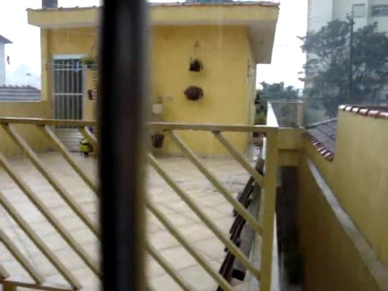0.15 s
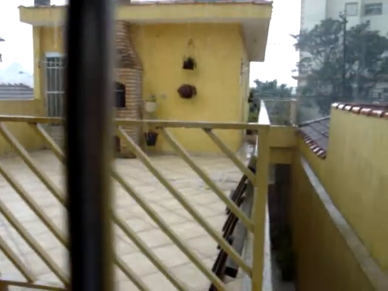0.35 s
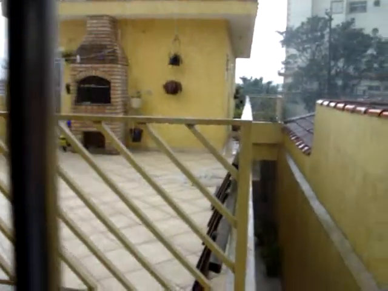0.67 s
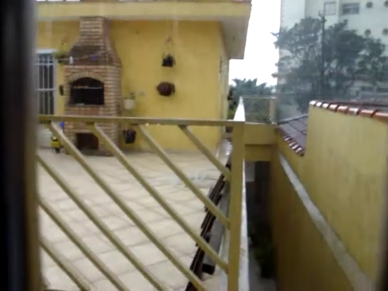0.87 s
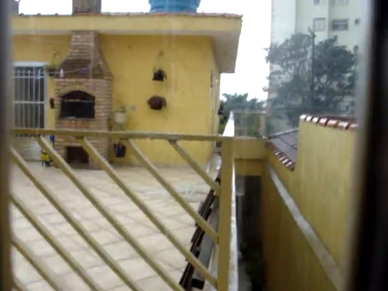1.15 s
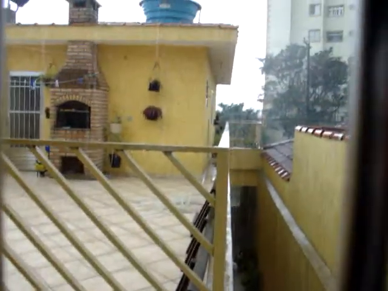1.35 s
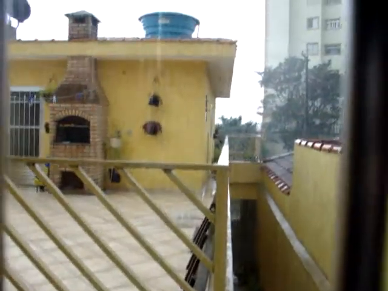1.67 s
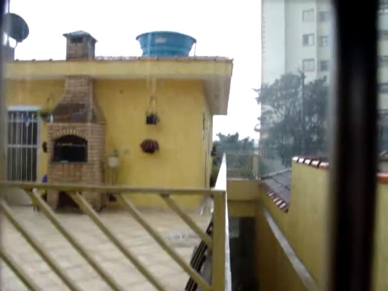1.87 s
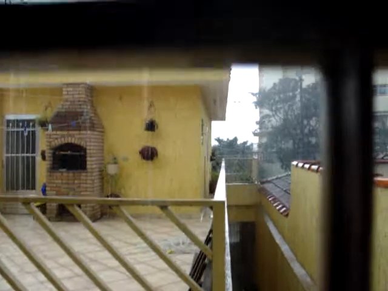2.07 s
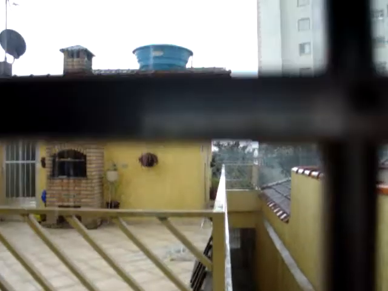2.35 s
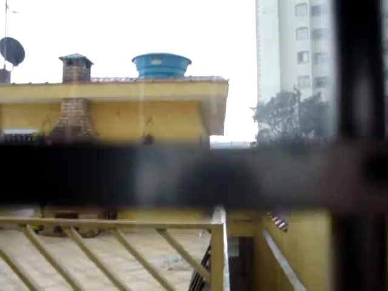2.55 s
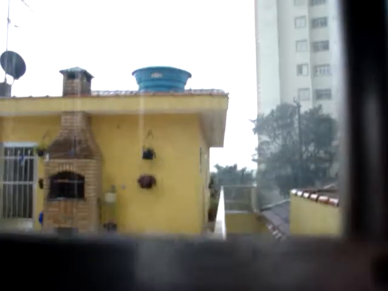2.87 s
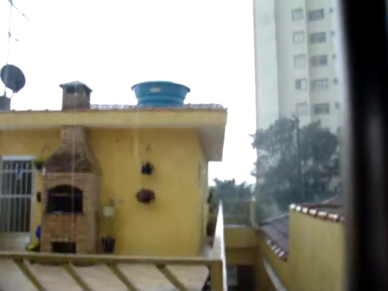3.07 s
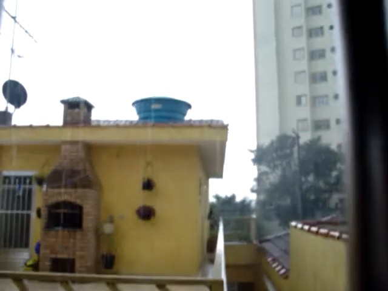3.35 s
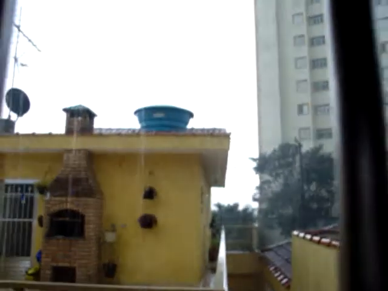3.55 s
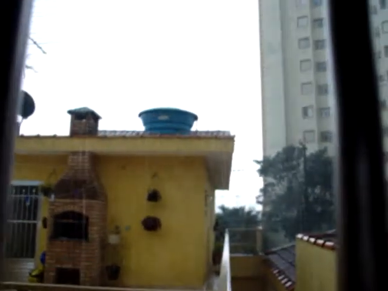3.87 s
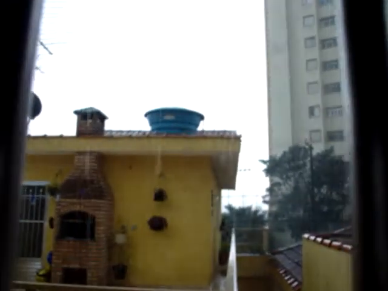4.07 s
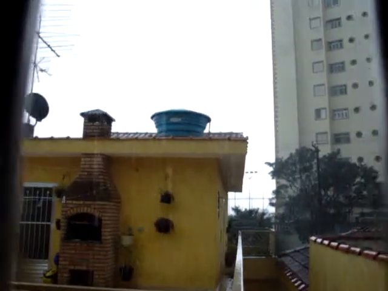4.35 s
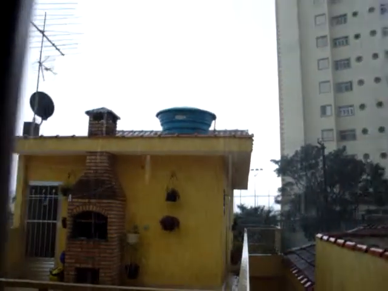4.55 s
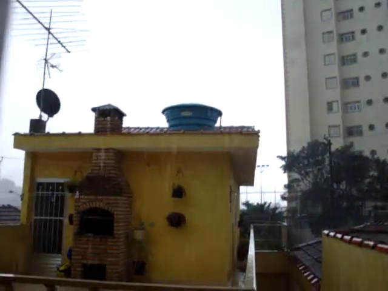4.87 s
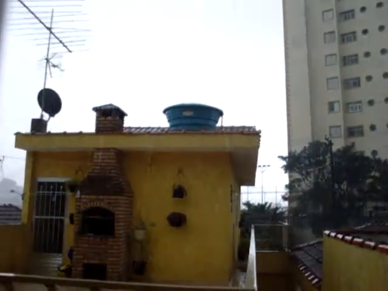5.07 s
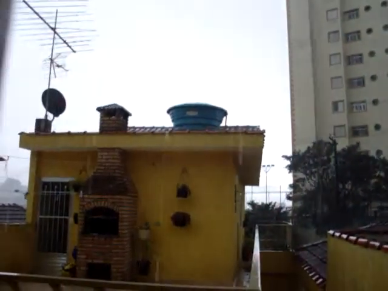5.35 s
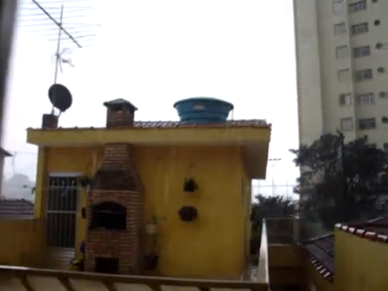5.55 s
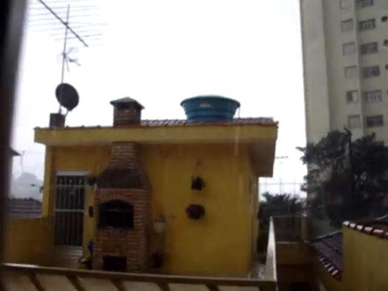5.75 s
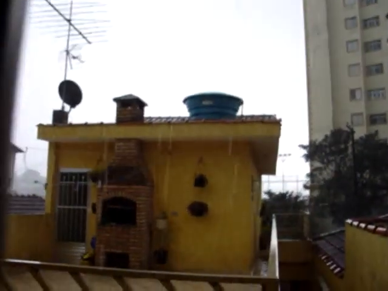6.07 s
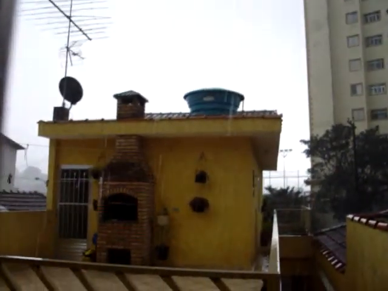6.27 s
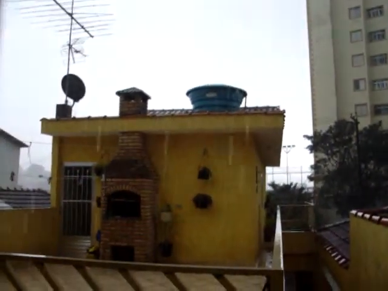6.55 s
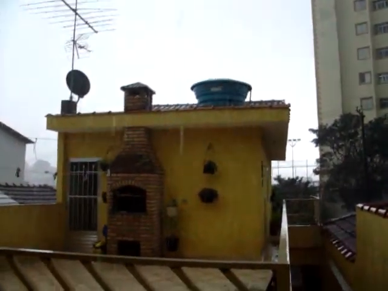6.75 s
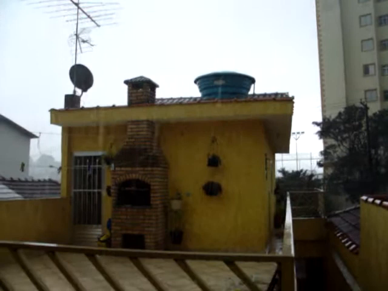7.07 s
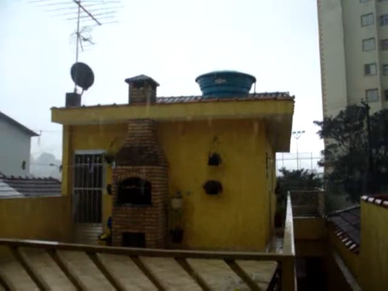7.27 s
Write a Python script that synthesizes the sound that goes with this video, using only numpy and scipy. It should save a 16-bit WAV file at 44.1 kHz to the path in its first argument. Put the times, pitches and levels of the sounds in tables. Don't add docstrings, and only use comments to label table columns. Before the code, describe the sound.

Steady dense rain hisses over a tiled terrace and clay roofs, with close drops pattering and sharp wet splashes of run-off bursting throughout.

```python
import sys
import numpy as np
from scipy import signal
from scipy.fft import rfft, irfft
from scipy.io import wavfile
from scipy.ndimage import uniform_filter1d

SR = 44100
rng = np.random.default_rng(int(sys.argv[2]) if len(sys.argv) > 2 else 0)


def rack_gain(trim_db):
    fader = np.asarray(trim_db, float)
    return 10 ** (fader / 20)


def materialize(psi):
    bounded = np.clip(np.atleast_2d(psi).T, -1, 1)
    quanta = np.round(bounded * 32767).astype(np.int16)
    wavfile.write(sys.argv[1], SR, quanta)


N = 326781


def evened(x):
    return x / np.sqrt(np.mean(x ** 2) + 1e-20)


def coloured(x, points):
    point_hz, point_db = np.transpose(points)
    hz = np.fft.rfftfreq(len(x), 1 / SR)
    gain_db = np.interp(np.log(hz + 1), np.log(point_hz + 1), point_db)
    return evened(irfft(rfft(x) * rack_gain(gain_db), len(x)))


def resonate(x, hz, width_hz):
    return evened(signal.lfilter(*signal.iirpeak(hz, hz / width_hz, SR), x))


def add(mix, s, sound):
    part = mix[round(s * SR):][:len(sound)]
    part += sound[:len(part)]


def clumped(x, ms, depth_db):
    length = round(ms * SR / 1000)
    swell = uniform_filter1d(rng.standard_normal(N), length)
    swell = evened(uniform_filter1d(swell, length))
    return evened(x * rack_gain(depth_db * swell))


def drops(per_s, spread_db, smooth):
    size = rack_gain(spread_db * np.minimum(rng.exponential(1, N), 5))
    hits = size * (rng.random(N) < per_s / SR)
    return evened(hits * rng.standard_normal(N)) + smooth * rng.standard_normal(N)


def burst(t60, rise_s):
    t = np.arange(round(.25 * SR)) / SR
    return (1 - np.exp(-t / rise_s)) * rack_gain(-60 * t / np.clip(t60, .008, .5))


# start_s, level_db
RAIN_STRENGTH = [
    (0.0, -22),
    (1.59, -22.5),
    (1.92, -18),
    (2.21, -22),
    (6.35, -21),
    (6.5, -20.5),
    (7.08, -22),
    (7.41, -21.5),
]
# middle_s, level_db, length_s, extra_spray_db
GUSTS = [(0, 5.5, 0.067, 0), (0.163, 0, 0.069, 4), (0.462, 2.5, 0.04, 2), (0.516, -4, .1, -2),
         (0.87, 4, .12, -5.5), (1.013, -3, 0.015, -7), (1.14, -3.5, 0.12, 3.5), (1.331, 1.5, .08, 1.5),
         (1.724, 1, 0.082, 3), (1.952, -2.5, .1, 4), (2.44, 2, 0.049, 1.5), (2.658, -2, 0.092, -3.5),
         (3.091, -7.5, 0.036, 1.5), (3.337, 0, 0.13, 0.5), (3.489, -3.5, .06, -1), (4.023, -2.5, 0.14, -1),
         (4.262, 7.5, 0.053, -1.5), (4.52, 4.5, 0.17, -1), (4.688, -5, 0.063, -1.5), (4.879, 1.5, 0.16, 1),
         (5.264, -5, .04, -3.5), (5.403, -3, 0.071, -1.5), (3.72, 0.5, 0.11, 0.5), (5.755, -4.5, 0.071, 1),
         (5.955, 2.5, .15, -1), (6.22, -2, 0.14, 2), (6.337, 1.5, 0.073, 1), (6.603, 1, 0.18, 2.5),
         (7.04, -0.5, .1, 6.5), (7.21, -1.5, 0.099, -0.5)]


def level(db, share, ms, depth_db, spray=False):
    rain_s, rain_db = np.transpose(RAIN_STRENGTH)
    swing_db = np.interp(np.arange(N) / SR, rain_s, rain_db - rain_db.mean())
    for s, gust_db, length_s, spray_db in GUSTS:
        bump = signal.windows.hann(round(2 * max(length_s, .01) * SR))
        early = max(round((length_s - s) * SR), 0)
        add(swing_db, max(s - length_s, 0), (gust_db + spray * spray_db) * bump[early:])
    return rack_gain(db + share * swing_db) * clumped(np.ones(N), ms, depth_db)


# pitch_hz, level_db (per Hz)
FAR_RAIN_COLOUR = [(26, -50), (45, -22), (257, -5.5), (361, -2), (485, -2.5), (780, -3), (1230, -4),
                   (2020, -5.5), (2830, -3.5), (5590, -5.5), (7670, -2), (8790, -2.5), (10100, -12),
                   (13100, -45), (22000, -120)]
# pitch_hz, width_hz, level_db
ROOM_HUMS = [(163.5, 26, -31), (231, 37, -34), (346.7, 40, -26.5), (395.6, 60, -29), (590, 90, -27.5),
             (795, 100, -27)]


def wash():
    swell = level(0, share=-0.16, ms=63.5, depth_db=0.71)
    noise = rng.standard_normal(N)
    hum = np.zeros(N)
    for hz, width_hz, db in ROOM_HUMS:
        hum += rack_gain(db + 3.5) * resonate(resonate(noise, hz, width_hz), hz, width_hz)
    far = coloured(rng.standard_normal(N), FAR_RAIN_COLOUR)
    growth_db = 0.21 * (np.arange(N) - N / 2) / SR
    return rack_gain(-23) * (far + hum) * swell * rack_gain(growth_db)


# pitch_hz, level_db (per Hz)
SPRAY_COLOUR = [(3000, -26.5), (5000, -11.5), (6500, -2.5), (7800, 2), (9000, -3), (10100, -13)]


def fine_spray(per_s, smooth):
    return coloured(drops(per_s, spread_db=2.0, smooth=smooth), SPRAY_COLOUR)


# pitch_hz, level_db (per Hz)
CLAY_COLOUR = [(900, -26.5), (1600, -8), (2200, -2), (2800, -3.5), (4000, -29.5)]
# pitch_hz, level_db (per Hz)
TILE_COLOUR = [(1500, -35), (2500, -7), (3300, -0.5), (4500, -0.5), (6000, -13), (9000, -30.5)]
# pitch_hz, level_db
SPRAY_TRIM = [(3000, -8), (5000, 0.5), (9500, -2), (10300, -4.5)]


def patter():
    knocks = coloured(drops(2000, spread_db=4.0, smooth=0.67), CLAY_COLOUR)
    knocks = knocks * level(-35, share=1.5, ms=43, depth_db=2)
    taps = coloured(drops(2400, spread_db=3.0, smooth=.8), TILE_COLOUR)
    taps = taps * level(-30.5, share=1.5, ms=35, depth_db=1.4)
    fizz = fine_spray(4000, smooth=.9)
    clumps = np.zeros(N)
    for hz in range(5200, 10200, 600):
        tilt_db = -1.2 * abs(hz - 7800) / 1000
        clumps += rack_gain(tilt_db) * clumped(resonate(fizz, hz, 500), 9, depth_db=4.0)
    spray_level = level(-26.5, share=1.12, ms=32, depth_db=1.5, spray=True)
    return knocks + taps + spray_level * coloured(clumps, SPRAY_TRIM)


# start_s, peak_db, t60_s
SPITS = [(0.2009, -10, 0.22), (0.2744, -8, 0.12), (0.4304, -6, 0.089), (0.8194, -14.5, 0.082),
         (1.0201, -7, 0.091), (1.3004, -6.5, 0.12), (1.4594, -7.5, 0.085), (1.6894, -13.5, 0.36),
         (1.8796, -7, 0.062), (2.0986, -8.5, 0.15), (2.2294, -13.5, 0.12), (2.3994, -8.5, 0.14),
         (2.7274, -9.5, 0.17), (2.8094, -15, 0.15), (3.2594, -17, 0.17), (3.5174, -9, 0.14),
         (3.6894, -10.5, 0.24), (3.9644, -13.5, 0.04), (4.1964, -10.5, 0.04), (4.2594, -13, 0.12),
         (4.4894, -14.5, 0.047), (4.8494, -14, 0.12), (5.1816, -8.5, 0.14), (5.444, -11, 0.22),
         (5.6765, -10.5, 0.12), (6.3024, -10.5, 0.1), (6.4567, -6, 0.093), (6.5574, -11.5, 0.12),
         (7.0025, -12, 0.26), (7.3094, -9, 0.057)]


def spits():
    fizz, out = fine_spray(5000, smooth=.7), np.zeros(N)
    for s, db, t60 in SPITS:
        shape = burst(t60, rise_s=0.003)
        at = rng.integers(0, N - SR)
        add(out, s, rack_gain(db - 6.5) * shape * fizz[at:at + len(shape)])
    return out


def water_burst(crackle, fizz, db, hz, t60, spray_db):
    shape = burst(t60, rise_s=.0022)
    tick = 1.3 * burst(0.016, rise_s=0.00045)
    at = rng.integers(0, N - SR)
    part = slice(at, at + len(shape))
    wide = resonate(crackle[part], 4600, 4500)
    ring = resonate(crackle[part], hz, 340)
    body = resonate(resonate(crackle[part], 3200, 3800), hz, 1900) + 0.18 * ring
    water = shape * (.8 * body + .35 * wide)
    hit = tick * (.3 * body + .8 * wide)
    return rack_gain(db - 8.5) * (water + hit + rack_gain(spray_db) * shape * fizz[part])


# start_s, peak_db, body_hz, t60_s
TRICKLES = [(0.0654, -15.5, 4000, 0.082), (0.5554, -14, 3400, 0.13), (1.1821, -17.5, 3210, 0.27),
            (1.328, -12, 2950, 0.2), (1.9337, -15, 3270, 0.2), (2.0108, -15, 4300, 0.14),
            (2.2126, -18.5, 4400, 0.13), (2.3143, -15.5, 5100, 0.12), (2.3945, -17.5, 3370, 0.26),
            (2.4917, -13, 4730, 0.19), (2.6988, -12.5, 3660, 0.15), (2.7309, -16, 2810, 0.15),
            (3.096, -17.5, 3160, 0.12), (3.3556, -14, 3100, 0.081), (3.3893, -17.5, 3580, 0.14),
            (3.5169, -15, 5330, 0.15), (4.2764, -12.5, 4200, 0.1), (4.3155, -15, 3200, 0.15),
            (4.3495, -15, 3260, 0.15), (4.6476, -15.5, 3530, 0.18), (4.7524, -13.5, 3760, 0.081),
            (4.8925, -14.5, 2440, 0.15), (5.039, -13, 2910, 0.15), (5.0948, -11.5, 4310, 0.098),
            (6.3394, -12.5, 3280, 0.13), (6.3694, -18.5, 4020, 0.14), (6.4698, -15.5, 3600, 0.15),
            (6.5105, -16, 2770, 0.15), (6.947, -14.5, 3510, 0.15), (7.0046, -13.5, 3150, 0.15)]
# start_s, peak_db, body_hz, t60_s
SLAPS = [(0.1265, -20.5, 3740, 0.14), (0.1956, -8.5, 4730, 0.22), (0.349, -21, 4200, 0.094),
         (0.4132, -13.5, 3670, 0.2), (0.9682, -11.5, 3900, 0.15), (1.2489, -15.5, 3700, 0.25),
         (1.2978, -15.5, 4500, 0.26), (1.3674, -11.5, 3300, 0.21), (1.603, -7.5, 3900, 0.14),
         (1.8058, -12, 4000, 0.17), (2.0979, -15, 4280, 0.33), (2.9737, -13, 3700, 0.16),
         (3.1254, -9, 3700, 0.12), (3.5871, -13.5, 3800, 0.51), (3.7999, -15.5, 3600, 0.31),
         (3.8852, -16, 3470, 0.2), (4.2538, -13.5, 4260, 0.34), (4.483, -8.5, 4700, 0.21),
         (4.5547, -16, 4800, 0.21), (5.1394, -10.5, 3620, 0.17), (5.4425, -10.5, 3500, 0.3),
         (5.7997, -15, 3500, 0.33), (6.1544, -11, 4500, 0.15), (6.2926, -11, 3930, 0.2),
         (6.5344, -15.5, 3700, 0.22), (6.8757, -10.5, 3430, 0.18), (6.9734, -14.5, 3560, 0.17),
         (7.247, -9.5, 4230, 0.18), (7.3081, -12.5, 3570, 0.19), (7.3445, -8, 3570, 0.17)]
# start_s, peak_db, body_hz, t60_s
SPLASHES = [(0.271, -15.5, 3340, 0.23), (0.623, -14.5, 3100, 0.45), (0.8275, -14, 2660, 0.23),
            (0.9124, -13.5, 2630, 0.24), (1.0211, -15, 2780, 0.11), (1.2115, -16, 2630, 0.1),
            (1.8786, -17, 2500, 0.16), (2.0376, -14, 3220, 0.16), (2.1656, -16.5, 3400, 0.16),
            (2.3411, -16, 2920, 0.16), (2.5191, -11, 2700, 0.19), (2.5621, -10.5, 2520, 0.22),
            (2.7841, -13, 2610, 0.13), (2.8097, -10.5, 2740, 0.18), (3.2186, -10, 2800, 0.26),
            (3.2627, -9, 2670, 0.16), (3.3192, -13.5, 2960, 0.29), (3.6924, -10.5, 2410, 0.16),
            (4.189, -9, 2900, 0.16), (4.3919, -13.5, 2770, 0.22), (4.814, -14.5, 2810, 0.21),
            (4.914, -9, 2760, 0.22), (5.2074, -15, 2540, 0.12), (5.282, -8.5, 2750, 0.18),
            (5.5879, -11, 2560, 0.21), (5.6939, -13, 3050, 0.16), (5.906, -11, 2910, 0.15),
            (6.429, -8, 3150, 0.14), (6.672, -14, 2750, 0.18), (7.1392, -13, 2780, 0.17)]


def splashes():
    crackle = drops(3200, spread_db=1.57, smooth=0.86)
    fizz = fine_spray(5000, smooth=.7)
    out = np.zeros(N)
    for rows, spray_db in ((TRICKLES, -8), (SLAPS, -8.5), (SPLASHES, -4.5)):
        for s, db, hz, t60 in rows:
            add(out, s, water_burst(crackle, fizz, db, hz, t60, spray_db))
    return out


# start_s, bias_jump_db
OVERLOADS = [(0.203, -26.0), (0.218, -37.0), (0.279, -36.0), (0.447, -32.0), (1.023, -23.0), (1.327, -31.0),
             (1.71, -28.0), (1.722, -35.0), (2.102, -31.0), (2.308, -39.0), (2.734, -35.0), (2.838, -35.0),
             (3.322, -39.0), (3.519, -26.0), (4.197, -36.0), (4.21, -32.0), (4.278, -36.0), (4.509, -26.0),
             (4.932, -31.0), (5.1, -39.0), (5.185, -33.0), (5.21, -33.0), (5.286, -39.0), (5.591, -34.0),
             (6.46, -29.0), (6.475, -37.0), (6.595, -34.0), (6.676, -32.0), (7.007, -28.0), (7.346, -40.0)]


def cracks():
    out = np.zeros(N)
    for s, db in OVERLOADS:
        crack = resonate(rng.standard_normal(400), 5200, 6600)
        crack = crack * burst(0.014, rise_s=0.00063)[:400]
        add(out, s - .0015, rack_gain(0.72 * db + 11.5) * crack)
    return out


def scene():
    return np.tile(wash() + patter() + spits() + splashes() + cracks(), (2, 1))


def bias():
    charge = np.zeros(N)
    nudges = [(s, db - 35.5) for s, db, hz, t60 in SPLASHES + SLAPS]
    for s, db in OVERLOADS + nudges:
        add(charge, s - .002, rack_gain(db) * signal.windows.hann(200) / 100)
    fast, slow = 48.6, 14.6
    t = np.arange(SR // 2) / SR
    drain = (fast * np.exp(-fast * t) - slow * np.exp(-slow * t)) / (fast - slow)
    return signal.oaconvolve(charge, drain)[:N]


BAND_STEPS = [63] * 3 + [15] * 2 + [9] * 2 + [7] * 2 + [5] + [3] * 22


def camera_rounding(x):
    bands, taps, lead = 32, 512, 309
    ramp = np.minimum(np.arange(2049) / 64, 1)
    proto = irfft(np.cos(np.pi / 2 * np.sin(np.pi / 2 * ramp) ** 2))
    proto = np.roll(proto, taps // 2)[:taps]
    k, n = np.arange(bands)[:, None], np.arange(taps) - taps // 2
    carrier = np.cos((k + .5) * np.pi / bands * n + (-1) ** k * np.pi / 4)
    bank = 2 * np.sqrt(bands) * proto * carrier
    frames = N // 1500 + 2
    slow = np.zeros(frames * 36 * bands + taps)
    add(slow[lead:], 0, signal.resample_poly(x, 320, 441))
    z = np.lib.stride_tricks.sliding_window_view(slow, taps)[:-1:bands] @ bank.T
    z = z.reshape(frames, 36, bands)
    peak = abs(z).max(axis=1, keepdims=True) + 1e-9
    steps = np.array(BAND_STEPS)
    step = 2 ** (np.ceil(3 * np.log2(peak)) / 3) * 2 / steps
    z = np.clip(np.round(z / step), -(steps // 2), steps // 2) * step
    grains = (z.reshape(-1, bands) @ bank).reshape(-1, taps // bands, bands)
    out = np.zeros((len(grains) + taps // bands, bands))
    for j in range(taps // bands):
        add(out[j:], 0, grains[:, j])
    return signal.resample_poly(out.ravel()[lead:], 441, 320)[:N]


# middle_s, low_hz, high_hz
SIDE_PUFFS = [
    (4.618, 5100, 6300),
    (4.618, 8100, 9900),
    (5.733, 5500, 8400),
    (5.941, 4400, 5900),
    (6.059, 4400, 6500),
    (6.059, 8100, 9900),
    (7.104, 6400, 7800),
]


def side_noise():
    side, hz = np.zeros(N), np.fft.rfftfreq(2048, 1 / SR)
    for s, low_hz, high_hz in SIDE_PUFFS:
        noise = rng.standard_normal(2048)
        band = irfft(rfft(noise) * (hz > low_hz) * (hz < high_hz))
        add(side, s - 1024 / SR, rack_gain(-22) * band * signal.windows.cosine(2048))
    return side * [[1], [-1]]


def top_cut(x):
    return signal.sosfilt(signal.butter(12, 10220, fs=SR, output="sos"), x)


def record(dry):
    overloaded = 0.88 * np.tanh(dry[0]) + bias()
    rounded = camera_rounding(overloaded)
    low_pass = signal.firwin(751, 10075, window=("kaiser", 10), fs=SR)
    limited = signal.oaconvolve(rounded, low_pass, "same")
    return top_cut(limited + side_noise())


dry = scene()
out = record(dry)
materialize(out)
```